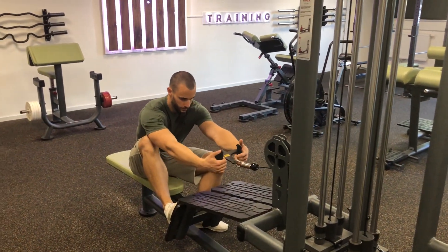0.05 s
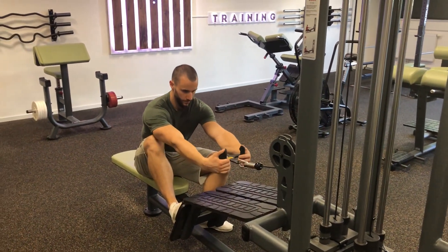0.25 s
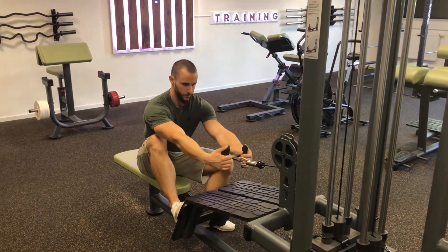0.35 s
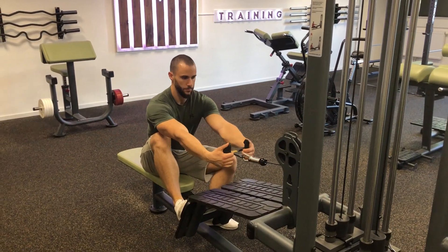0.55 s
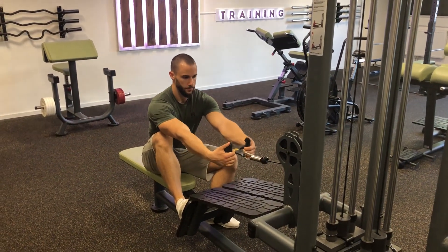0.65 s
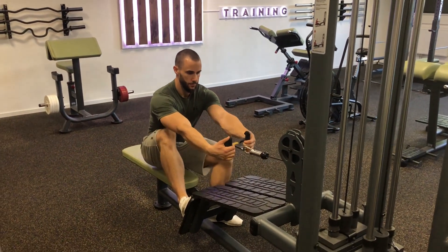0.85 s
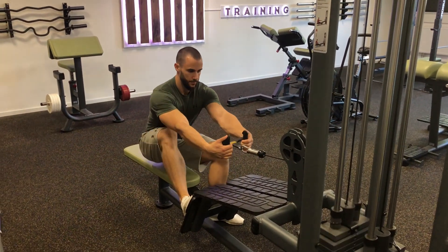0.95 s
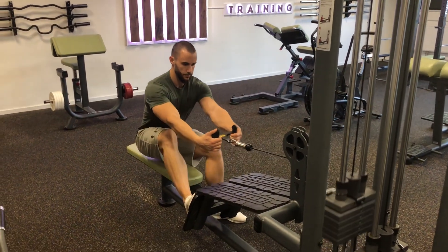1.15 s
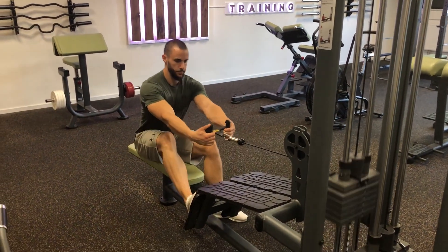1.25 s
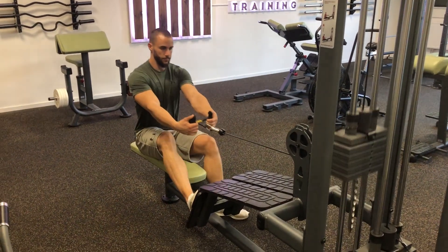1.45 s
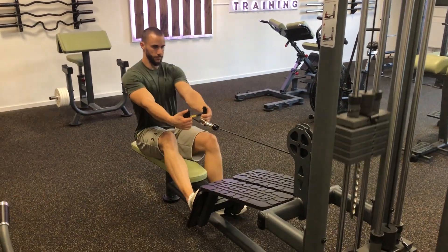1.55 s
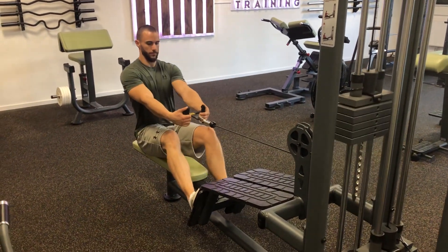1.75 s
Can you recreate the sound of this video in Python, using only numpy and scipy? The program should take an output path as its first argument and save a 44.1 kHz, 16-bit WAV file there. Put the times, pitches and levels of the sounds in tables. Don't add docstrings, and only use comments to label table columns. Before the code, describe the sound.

A sharp iron clank of weight plates with short ring and soft room echo, then faint knocks

```python
import sys
import numpy as np
from scipy import signal
from scipy.fft import rfft, irfft
from scipy.io import wavfile

SR = 44100
rng = np.random.default_rng(int(sys.argv[2]) if len(sys.argv) > 2 else 0)


def put_to_file(sound):
    columns = np.atleast_2d(sound).T
    safe = np.clip(columns, -1, 1)
    whole_steps = np.round(safe * 32767)
    wavfile.write(sys.argv[1], SR, whole_steps.astype(np.int16))


def volts_from_decibels(level):
    exponent = np.asarray(level, float) / 20
    return 10 ** exponent


N = 79380
T = np.arange(N) / SR


def at_hz(points, hz):
    table_hz, value = np.transpose(points)
    return np.interp(np.log(np.maximum(hz, 1)), np.log(table_hz), value, left=-70)


def rms_one(x):
    return x / np.sqrt(np.mean(x ** 2) + 1e-20)


def shaped(x, spectrum, db=0):
    gain = volts_from_decibels(db + at_hz(spectrum, np.fft.rfftfreq(N, 1 / SR)))
    return irfft(rfft(x) * gain, N)


def coloured(spectrum):
    return rms_one(shaped(rng.standard_normal(N), spectrum))


def band(x, hz, octaves):
    low, high = hz * 2 ** (-octaves / 2), hz * 2 ** (octaves / 2)
    edges = np.clip([low, high], 10, SR * 0.45)
    return signal.sosfilt(signal.butter(2, edges, "band", fs=SR, output="sos"), x)


def dying(s, t60):
    return (T >= s) * volts_from_decibels(-60 * np.maximum(T - s, 0) / t60)


def struck(modes, s, rise):
    late = np.maximum(T - s, 0)
    tones = sum(volts_from_decibels(db) * dying(s, t60) * np.sin(2 * np.pi * hz * late) for hz, db, t60 in modes)
    return tones * (1 - np.exp(-late / rise))


def resonate(modes, drive):
    out = np.zeros(N)
    for k, (hz, level_db, t60) in enumerate(modes):
        r = volts_from_decibels(-60 / (t60 * SR))
        w = 2 * np.pi * hz / SR
        ringing = signal.lfilter([0, np.sin(w)], [1, -2 * r * np.cos(w), r * r], drive(k) + 1e-18)
        out += volts_from_decibels(level_db) * ringing
    return out


def radiated(iron):
    low_hz, dip_hz, dip_width_hz, dip_share = 513, 2150, 230, 0.65
    iron = signal.sosfilt(signal.butter(3, low_hz, "high", fs=SR, output="sos"), iron)
    dip = signal.lfilter(*signal.iirpeak(dip_hz, dip_hz / dip_width_hz, fs=SR), iron)
    return iron - dip_share * dip


# (time [s], pitch [Hz], level [dB])
DUCT = [(0.0, 178.6, -60), (0.04, 177.5, -56), (0.164, 169, -51.5), (0.214, 174.1, -41),
        (0.274, 168.3, -59), (0.314, 174.3, -41.5), (0.366, 171.3, -53), (0.446, 179.9, -55.5),
        (0.556, 169.2, -46.5), (0.732, 170.8, -57), (0.762, 170.1, -45.5), (0.922, 170.8, -44),
        (0.982, 180.5, -50), (1.128, 182.1, -55.5), (1.228, 171.3, -46), (1.528, 170.8, -43.5),
        (1.648, 171.9, -58.5), (1.8, 169.1, -42)]
# (frequency [Hz], level [dB per Hz])
AIR_LOW = [(25, -50), (42, -6), (65, 0), (100, -4), (140, 3.5), (250, -8), (400, -16), (1600, -46.5)]
# (frequency [Hz], level [dB per Hz])
AIR_HIGH = [(520, 1), (1200, 0.5), (1930, -5), (3300, -11), (5000, -16.5), (7500, -23), (11500, -48),
            (15900, -43.5)]


def ventilation():
    s, hz, db = np.transpose(DUCT)
    turns = np.cumsum(np.interp(T, s, hz)) / SR
    tone = np.sqrt(2) * volts_from_decibels(np.interp(T, s, db)) * np.sin(2 * np.pi * turns)
    air_hz, air_width_hz = 171.6, 30
    air = rms_one(band(rng.standard_normal(2 * N), air_hz, air_width_hz / air_hz * 1.5)[N:])
    return tone + volts_from_decibels(-52.5) * air + volts_from_decibels(-50) * coloured(AIR_LOW) + volts_from_decibels(-65) * coloured(AIR_HIGH)


# (centre [s], half length [s], level [dB], centre pitch [Hz], width [octaves])
RUSTLES = [
    (1.9, .03, -72, 14500, .4),
    (1.715, 0.052, -65, 3200, 1.2),
    (1.703, 0.14, -76.5, 9000, 0.94),
    (.0, 0.018, -84, 5300, 0.71),
    (1.46, 0.17, -68.5, 1240, 3.3),
    (0.944, 0.075, -70.5, 4000, 1.05),
]


def rustles():
    out = np.zeros(N)
    for s, half, db, hz, wide in RUSTLES:
        hiss = rms_one(band(rng.standard_normal(N), hz, wide))
        out += volts_from_decibels(db) * hiss * np.exp(-((T - s) / half) ** 2)
    return out


# (time [s], level [dB], centre pitch [Hz], width [octaves], t60 [s])
KNOCKS = [
    (.180, -68, 8000, 0.5, 0.014),
    (0.93, -43.5, 1118, 2.5, 0.034),
    (.9290, -69, 7100, 1.1, 0.037),
    (.9510, -49, 920, 2.1, .04),
    (0.97, -51, 897.5, 1.9, 0.041),
    (1.2116, -53.5, 4400, 1.05, 0.032),
    (1.2110, -61, 11100, 0.63, 0.013),
    (1.282, -64, 9600, .7, 0.0071),
    (1.329, -51.5, 720, 1.675, 0.082),
]


def knocks():
    out = np.zeros(N)
    for s, db, hz, wide, t60 in KNOCKS:
        puff = rng.standard_normal(N) * dying(s, t60) + 1e-18
        knock = band(band(puff, hz, wide), hz, wide)
        out += volts_from_decibels(db) * knock * np.sqrt(SR / 2 / (hz * wide))
    return out


# (frequency [Hz], level [dB], t60 [s])
TICK = [(2060, -49, .04), (3630, -48, 0.052), (5100, -57, .03), (7680, -35, .06), (9300, -53, .02),
        (11340, -44, 0.025), (11970, -56, .03)]


def tick():
    return struck(TICK, 0.22, rise=0.00094)


# (time [s], plates level [dB], pin level [dB])
CONTACTS = [
    (0.2223, -45.5, -67),
    (0.2295, -43, -31),
    (0.2336, -35, -32),
    (0.2351, -27, -35),
    (0.2371, -32.5, -34),
    (0.241, -33.5, -29),
    (0.251, -36.5, -37),
    (0.263, -47.5, -44),
]
# (frequency [Hz], level [dB], t60 [s])
PLATES = [(553, -10.5, 0.048), (671, -11.5, 0.097), (812, -8, 0.047), (863, -15.5, 0.1), (1133, -5, 0.032),
          (1309, -14.5, 0.048), (1576, -3, 0.032), (1670, -8, 0.065), (1746.6, -7, 0.053),
          (2558, -6.5, 0.043), (2965, -8, 0.0275), (3080, 0.5, 0.016), (3258, -7, 0.05),
          (3453, -0.5, 0.021)]
# (frequency [Hz], level [dB], t60 [s])
RODS = [(3644, -14.5, 0.14), (4278, -3.5, 0.059), (4367, 0, 0.028), (4460, 2.5, 0.017), (4825, -5, 0.038),
        (5040, -8, 0.018), (5770, -1, 0.0325), (6900, -21, .02), (6970, -1.5, 0.017)]
# (frequency [Hz], level [dB], t60 [s])
PIN = [(7750, 2, 0.023), (8170, 0, 0.015), (8380, -5, .01), (10200, -1, 0.012), (11540, 5, .01),
       (12140, -20, .006), (14500, 2, .004)]
# (frequency [Hz], level [dB per Hz])
CRACK = [(300, -16.5), (700, -10), (1600, -7), (2800, -0.5), (4500, -4), (7000, -6), (11000, -9),
         (16000, -16)]


def ring(modes, s, db):
    contact_t60_s, spread_db = 0.0055, 2
    grit = rng.standard_normal((2, N))
    grinds = np.array([dying(t, contact_t60_s) for t in s]) / np.sqrt(contact_t60_s * SR / 14)

    def drive(k):
        strengths = volts_from_decibels(db + spread_db * rng.standard_normal(len(s)))
        return strengths @ grinds * grit[k % 2]

    return resonate(modes, drive)


def clank():
    s, plate_db, pin_db = np.transpose(CONTACTS)
    crack_db, crack_t60_s = -1, 0.031
    bursts = sum(volts_from_decibels(db + crack_db) * dying(t, crack_t60_s) for t, db in zip(s, plate_db))
    crack = coloured(CRACK) * bursts
    return radiated(ring(PLATES + RODS, s, plate_db) + ring(PIN, s, pin_db) + crack)


def blow():
    click = 1.0 * (np.arange(N) == int(0.236 * SR))

    def drive(k):
        return click * (-1) ** k

    plates = volts_from_decibels(-22) * resonate(PLATES + RODS, drive)
    pin = volts_from_decibels(-28) * resonate(PIN, drive)
    return radiated(plates + pin + shaped(click, CRACK, db=8.5))


# (frequency [Hz], t60 [s])
GYM = [(100, 0.64), (400, 2.14), (1000, 1.136), (2500, 1.53), (5500, 0.87), (9000, .5), (15000, .3)]


def gym(x):
    rise_s = 0.0033
    white = rng.standard_normal((2, N))
    tail = np.zeros(N)
    table_hz, table_t60 = np.transpose(GYM)
    for k, hz in enumerate(60 * 2 ** np.arange(0, 8.3, 1 / 3)):
        t60 = np.interp(np.log(hz), np.log(table_hz), table_t60)
        tail += band(white[k % 2], hz, 1 / 3) * dying(0, t60)
    tail = tail * (1 - np.exp(-T / rise_s))
    return signal.fftconvolve(x, tail / np.sqrt(np.sum(tail ** 2)))[:N]


# (frequency [Hz], level [dB], t60 [s])
FRAME = [(422.4, -44, 0.61), (1122, -48, 0.33), (1582, -46.5, 0.21), (1665, -39.5, 0.55),
         (1696, -34.5, 0.35), (1768, -37.5, 0.42), (3440, -38, 0.59), (3510, -46, 0.7), (4334, -40, .25),
         (4510, -36, 0.39), (4360, -38, .25), (8170, -45, .3)]


def frame():
    return struck(FRAME, 0.24, rise=0.0063)


def thump():
    start_s, hz, t60_s, rise_s = 0.25, 78.9, 0.39, 0.011
    late = np.maximum(T - start_s, 0)
    swell = (1 - np.exp(-late / rise_s)) * dying(start_s, t60_s)
    return volts_from_decibels(-38.5) * swell * np.sin(2 * np.pi * hz * late)


def scene():
    small = knocks()
    near = rustles() + small + tick() + clank() + frame() + thump()
    echo = gym(volts_from_decibels(-5.5) * blow() + volts_from_decibels(-4) * small)
    return (near + echo + ventilation())[None]


def band_limit(x):
    return signal.sosfilt(signal.butter(12, 15830, fs=SR, output="sos"), x)


def record(dry):
    return band_limit(dry)


dry = scene()
out = record(dry)
put_to_file(out)
```